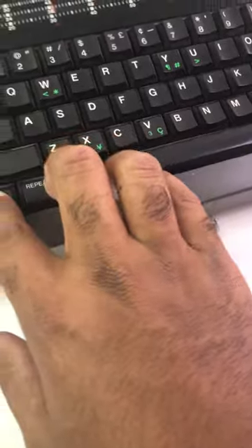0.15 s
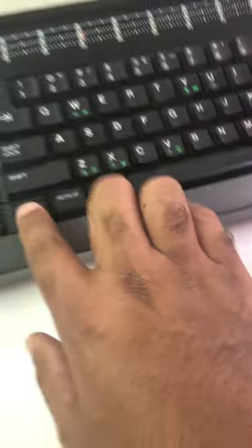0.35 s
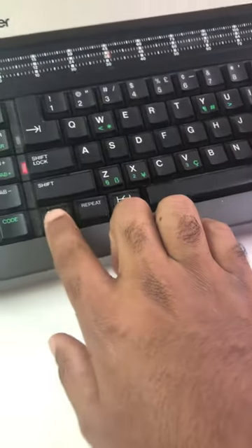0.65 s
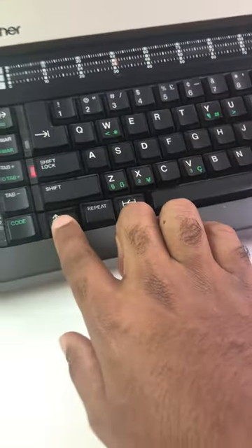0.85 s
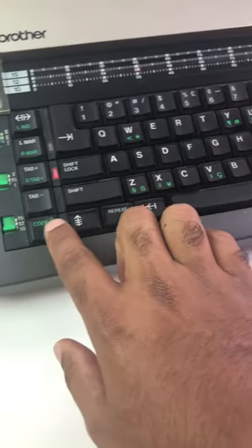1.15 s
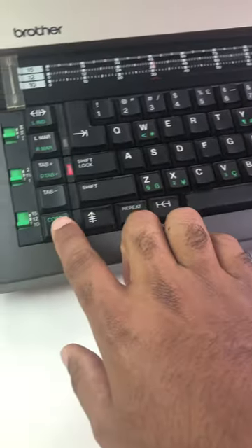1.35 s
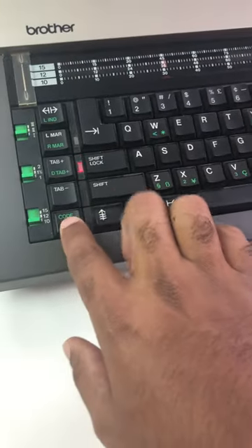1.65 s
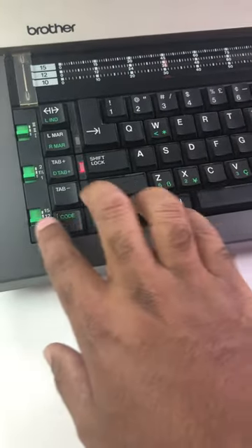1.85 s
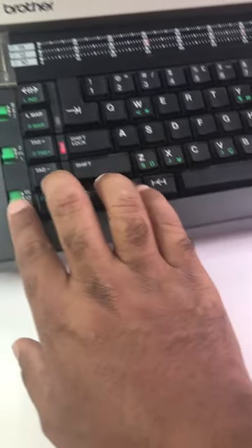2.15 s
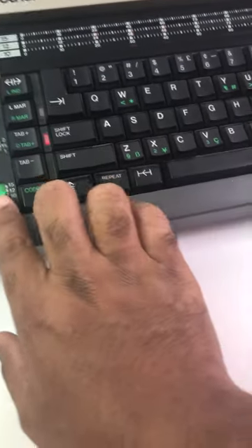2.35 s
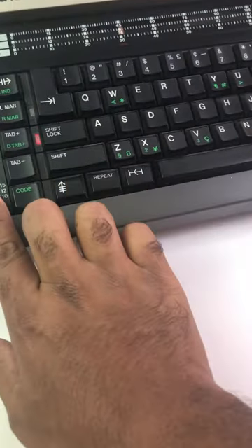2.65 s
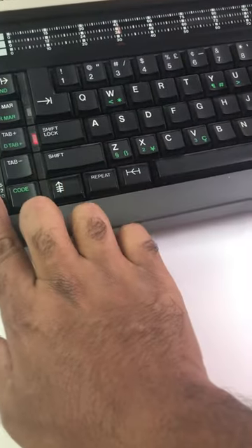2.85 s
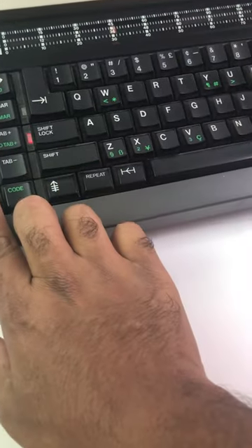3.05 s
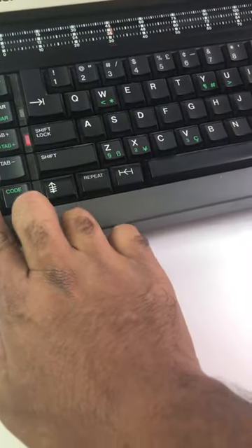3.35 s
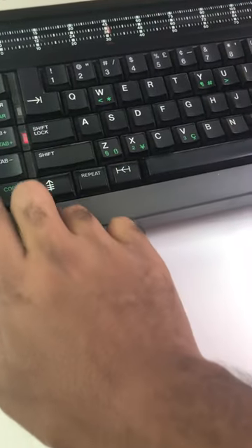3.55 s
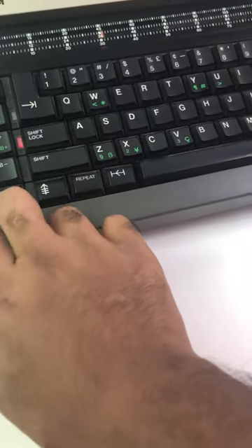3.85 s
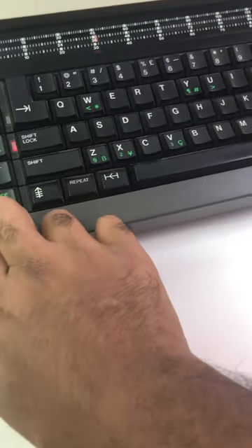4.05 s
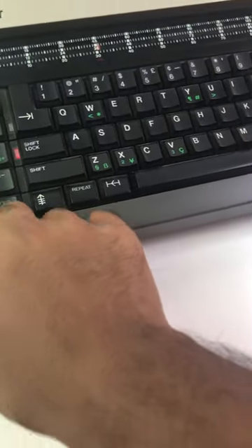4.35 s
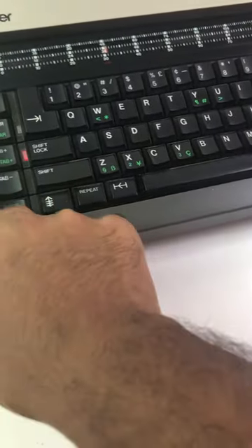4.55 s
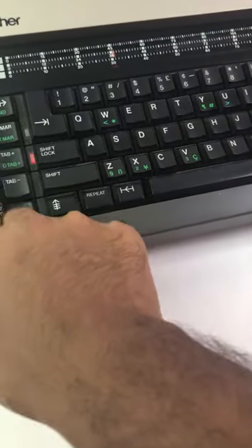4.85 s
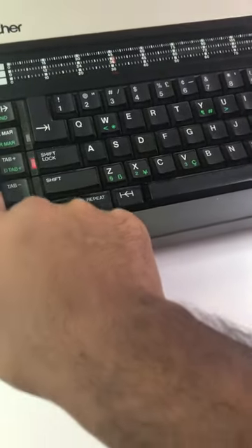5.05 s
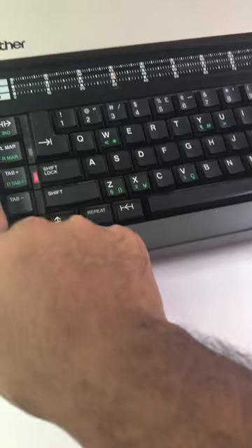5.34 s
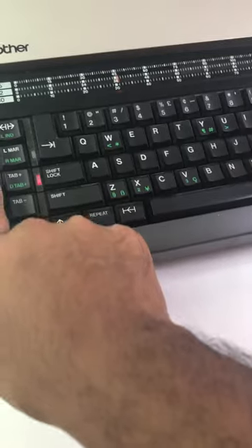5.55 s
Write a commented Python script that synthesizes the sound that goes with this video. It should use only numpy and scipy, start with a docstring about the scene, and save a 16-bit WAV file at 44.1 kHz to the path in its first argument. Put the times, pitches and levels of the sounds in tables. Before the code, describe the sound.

A faint steady hum and soft room tone run throughout, in a small quiet room with the microphone close to an electric typewriter. At about 0.9 seconds fingertips make a quick cluster of soft taps on loose plastic keycaps, which drop back dully. Sparse, lighter taps follow from 1.5 to 2.7 seconds, with tiny high squeaks and a very faint hiss of skin sliding over plastic. At 2.8 seconds the presses turn firmer and clearly louder: keys hit their stops with sharp clacks, each with a brief hollow ring from the case and a low thud into the desk. They come in uneven little groups around 2.9, 3.3, 3.8 to 4.1 and 4.6 seconds, with soft taps between. A strong single clack lands at 4.8, then three more from 5.3 to 5.5, the last the loudest. One soft tap follows near 5.7 seconds.

```python
"""Electric typewriter keys, close up

Fingers work the keys of an electric typewriter on a desk in a small quiet room. Fingertips first tap
loose keycaps, which drop back softly; then keys hit their stops with sharp plastic clacks. The hollow
case rings, the firmer pushes thud into the desk, and a faint hum lies under everything."""
import sys
import numpy as np
from scipy import signal
from scipy.fft import rfft, irfft, next_fast_len
from scipy.io import wavfile
from scipy.ndimage import uniform_filter1d

SR = 44100
rng = np.random.default_rng(int(sys.argv[2]) if len(sys.argv) > 2 else 0)


def master(y):
    """Save y as 16-bit WAV."""
    cut = np.clip(np.atleast_2d(y).T, -1, 1)
    pcm = np.round(cut * 32767)  # scale
    wavfile.write(sys.argv[1], SR, pcm.astype(np.int16))


N = 251811
HIT_TIME = np.arange(SR // 3) / SR  # time axis of one hit, in seconds

# spectrum of the room tone: freq_hz, gain_db
ROOM_TONE = [(15, -48), (25, -53), (48, -4.5), (80, -12), (170, -1), (263, -3.5), (293, -7), (405, -6.5),
             (439, -12), (863, -12), (936, -19.5), (1290, -15), (1520, -20), (2480, -21.5), (16000, -42)]
# steady hum lines: pitch_hz, rms_db
HUM_LINES = [(58, -76.5), (108, -74), (167, -73), (291, -70.5), (872, -79)]
# reverb time of the room: freq_hz, t60_s
ROOM_DECAY = [(120, 0.68), (600, 0.19), (2500, 0.28), (7000, 0.26), (15000, 0.13)]
# colour of plastic striking plastic: freq_hz, gain_db
PLASTIC_COLOUR = [(150, -9.5), (350, -4.5), (500, -2.5), (780, 7), (1200, 2.5), (1900, 5), (3100, -3.5),
                  (3800, 0), (5300, 1.5), (6200, -4.5), (8000, -7.5), (10300, -12), (12400, -6.5),
                  (14500, -8.5), (17000, -12)]
# resonances of the case and key frame: centre_hz, width_hz, gain_db
CASE_MODES = [(254, 96, 2), (384, 41, 10), (573, 22, -4.5), (741, 11, -38.5), (945, 5, -7.5),
              (1630, 9.3, -5), (1780, 25, -7), (2310, 12, -3.5), (2800, 31, -36), (3020, 220, 3.5),
              (4134, 65, -3), (4260, 28, -0.5), (7300, 31, -8.5), (7900, 80, -24), (9800, 82, -14),
              (11300, 300, 0), (13300, 71, -10.5)]
# low modes of the case panels: pitch_hz, gain_db, t60_s
PANEL_MODES = [(256.2, -2, 0.11), (299, -2.5, 0.072), (350.5, 6.5, 0.037)]
# fingertips squeaking on plastic: centre_s, pitch_hz, level_db
FINGER_SQUEAKS = [(1.552, 9500, -70), (1.727, 9400, -75), (1.89, 9600, -80), (2.266, 13000, -74),
                  (2.325, 15000, -76), (3.55, 13000, -69), (5.003, 13200, -75)]
# fingertips landing on loose keycaps (knock and rebound are relative to strength):
# start_s, strength_db, hardness_db, knock_db, thud_gain_db, rebound_db
KEYCAP_TAPS = [(0.8719, -51, -14.5, -6.5, -56, -9), (.919, -55, -17, 5.5, -52, -25),
               (0.938, -53.5, -22, -1, -50, -24), (1.014, -50.5, -26, 1, -51.5, -2.5),
               (1.027, -53, -17, -5.5, -49.5, -9), (1.1189, -54.5, -3, 3, -51.5, 2.5),
               (1.549, -54, -17, -5, -70, -26), (1.748, -65, -10, 7.5, -70, -12),
               (2.0124, -58.5, -7.5, 9, -80, -4.5), (2.535, -75, -18, -4, -57, -25),
               (2.663, -58.5, -26, 1.5, -54.5, -25), (3.526, -60.5, -34, 10.5, -61, -12),
               (3.765, -62.5, -13, -8, -72, -20), (4.268, -64, -24, 8, -60, -10),
               (4.297, -54.5, -28, -7, -83, -28), (4.3175, -66, 0.5, 14, -83, -28),
               (4.4851, -59.5, -2, 11, -61, -9), (4.9223, -59, -29, 1, -61.5, 1),
               (4.973, -59.5, -13, -0.5, -74, -7), (5.706, -55, -28, 1.5, -71, -20)]
# keys hitting their stops (the first touch comes early; touch and knock are relative to strength):
# stop_s, touch_lead_s, touch_db, strength_db, hardness_db, knock_db, thud_gain_db, thud_hz,
# boom_gain_db, keycap_hz
KEY_STROKES = [(2.8118, 0.0012, -30, -43.5, -7, -17, -74, 125, -81, 3950),
               (2.8215, .001, -29, -40.5, -15, 0, -51.5, 128, -50, 3170),
               (2.8942, 0.00138, -7.5, -36.5, -0.5, -4, -50.5, 132, -41.5, 2040),
               (3.3288, 0.0019, 0, -41, -4.5, -5, -60, 130, -43, 3200),
               (3.3547, 0.007, -4, -38, 1, -9, -43.5, 137, -40.5, 3640),
               (3.7928, .0047, -3, -42, -10, -4.5, -49.5, 123, -49, 2810),
               (3.8885, .004, -20, -35.5, -3, 0, -53, 192, -40.5, 2750),
               (4.028, 0.0019, -5, -44, -6.5, -2.5, -66, 119, -50.5, 3200),
               (4.068, .0018, -6, -32.5, -5.5, -2, -49, 90, -47.5, 2680),
               (4.523, 0.017, -10.5, -44, -6.5, -6.5, -53.5, 103, -58, 2940),
               (4.596, .009, -15, -34, -5, 0.5, -47, 147, -49, 2020),
               (4.6225, 0.0011, -6, -42.5, -6.5, -17, -63, 120, -61, 3800),
               (4.8056, 0.0044, -0.5, -33, 2, -2.5, -47, 110.6, -41.5, 3100),
               (5.267, 0.0094, 8.5, -47, -6.5, -2, -46, 119, -48, 2130),
               (5.3757, .003, -20, -31, -1, -1.5, -46.5, 113, -61.5, 1610),
               (5.5179, 0.0026, -24, -24, -0.5, -10, -43, 87, -51, 2330)]


def amp(db):
    """Decibels to gain."""
    return 10 ** (np.asarray(db) / 20)


def unit(x):
    """Scale to rms 1."""
    return x / np.sqrt(np.mean(x ** 2) + 1e-20)


def curve_at(points, hz):
    """Read a curve of (freq_hz, value) points on a log frequency axis."""
    freqs, values = np.transpose(points)
    return np.interp(np.log(hz + 1), np.log(freqs + 1), values)


def attack(rise_s):
    """Exponential rise of a hit."""
    return 1 - np.exp(-HIT_TIME / rise_s)


def decay(t60_s):
    """Exponential fall of a hit."""
    return amp(-60 * HIT_TIME / t60_s)


def filtered(x, response):
    """Shape x with a complex frequency response."""
    size = next_fast_len(len(x) + SR // 4)
    return irfft(rfft(x, size) * response(np.fft.rfftfreq(size, 1 / SR)), size)[:len(x)]


def resonance(f, centre_hz, width_hz):
    """Causal response of one mode, 1 at its centre."""
    return 1j * f * width_hz / (centre_hz ** 2 - f ** 2 + 1j * f * width_hz)


def focused(noise, centre_hz, width_hz):
    """Noise passed twice through one resonance, at rms 1."""
    return unit(filtered(noise, lambda f: resonance(f, centre_hz, width_hz) ** 2))


def band(x, low_hz, high_hz):
    """One band of a hit, scaled to hold the energy of 8 ms at rms 1."""
    y = signal.sosfilt(signal.butter(4, [low_hz, high_hz], 'band', fs=SR, output='sos'), x)
    return y / np.sqrt(np.sum(y ** 2) / (0.008 * SR))


def add(track, start_s, sound):
    """Mix a sound into the track."""
    part = track[max(round(start_s * SR), 0):][:len(sound)]
    part += sound[:len(part)]


def background():
    """The bed: soft room tone, a weak hum and a thin whine that soon stops."""
    t = np.arange(N) / SR
    air = unit(filtered(rng.standard_normal(N), lambda f: amp(curve_at(ROOM_TONE, f))))
    hum = sum(amp(db) * np.sqrt(2) * np.sin(2 * np.pi * (hz * t + rng.random())) for hz, db in HUM_LINES)
    whine = np.sin(2 * np.pi * 14890 * t) * np.clip((0.45 - t) / 0.1, 0, 1)
    return amp(-61) * air + hum + amp(-86) * whine


def room_reverb(x):
    """Diffuse reverb in which the bass lingers; each third of a second gets its own noise tail."""
    wet = np.zeros(N)
    block, predelay_s = len(HIT_TIME), 0.0055
    for start in range(0, N, block):
        hz, t, spectrum = signal.stft(rng.standard_normal(SR // 2), SR, nperseg=256)
        falloff = amp(-60 * t / curve_at(ROOM_DECAY, hz)[:, None])
        _, tail = signal.istft(spectrum * falloff, SR, nperseg=256)
        tail /= np.linalg.norm(tail)
        add(wet, start / SR + predelay_s, signal.fftconvolve(x[start:start + block], tail))
    return wet


def skin_slide(length_s, hz, width_hz, grain_db):
    """Skin sliding on plastic: a short swell of grainy noise in one resonance."""
    swell = np.hanning(round(length_s * SR))
    noise, grip = rng.standard_normal((2, len(swell)))
    grains = noise * amp(grain_db * unit(uniform_filter1d(grip, size=130)))
    return swell * focused(grains, hz, width_hz)


def finger_squeaks():
    """The hand hisses faintly as it shifts across the keys; sliding fingertips give tiny high squeaks."""
    track = np.zeros(N)
    add(track, 2.18, amp(-81.5) * skin_slide(length_s=1, hz=10900, width_hz=13000, grain_db=3))
    length_s = 0.032
    for centre_s, hz, db in FINGER_SQUEAKS:
        squeak = skin_slide(length_s, hz, width_hz=2000, grain_db=3.5)
        add(track, centre_s - length_s / 2, amp(db) * squeak)
    return track


def plastic_body(size=4096):
    """Impulse response of the hollow case: the colour of plastic with the case's resonances on top."""
    f = np.fft.rfftfreq(size, 1 / SR)
    modes = sum(amp(db) * resonance(f, hz, width_hz) for hz, width_hz, db in CASE_MODES)
    gain = amp(curve_at(PLASTIC_COLOUR, f)) * np.abs(1 + modes)
    # minimum phase keeps the attack tight
    cepstrum = irfft(np.log(gain + 1e-6))
    cepstrum[1:size // 2] *= 2
    cepstrum[size // 2 + 1:] = 0
    return irfft(np.exp(rfft(cepstrum)))


def chatter(body, crack_t60_s, buzz_db, buzz_t60_s):
    """A dense crack, then the buzz of loose parts settling, both heard through the body."""
    envelope = attack(0.0001) * (decay(crack_t60_s) + amp(buzz_db) * decay(buzz_t60_s))
    force = rng.standard_normal(len(HIT_TIME)) * envelope
    return signal.fftconvolve(force, body)[:len(HIT_TIME)]


def ringing(x, hz, width_hz, mix_db):
    """Lift the one mode that a contact excites most."""
    return filtered(x, lambda f: 1 + amp(mix_db) * resonance(f, hz, width_hz))


def contact(body, strength_db, hardness_db, knock_db, keycap_hz, case_ring):
    """Plastic meets plastic: the keycap clacks, the case knocks, and hardness adds click and snap."""
    rattle_db = -0.1 * (strength_db + 35)  # soft contacts carry a slightly larger share of buzz
    click_db = -6 + 0.25 * hardness_db + 9 * np.log2(keycap_hz / 2640)  # higher keycaps click more
    snap = chatter(body, crack_t60_s=0.0049, buzz_db=rattle_db - 16.5, buzz_t60_s=0.052)
    click = chatter(body, crack_t60_s=0.022, buzz_db=rattle_db - 15.5, buzz_t60_s=0.11)
    clack = chatter(body, crack_t60_s=0.0095, buzz_db=rattle_db - 11.5, buzz_t60_s=0.067)
    knock = chatter(body, crack_t60_s=0.028, buzz_db=rattle_db - 1.5, buzz_t60_s=0.12)
    clack = ringing(clack, keycap_hz, width_hz=470, mix_db=2)
    knock = ringing(knock, **case_ring)
    sound = amp(hardness_db) * band(snap, 7450, 15500) + amp(click_db) * band(click, 3170, 8600)
    # keycap and case speak just after the snap
    add(sound, 0.0005, band(clack, 1090, 3800))
    add(sound, 0.0008, amp(knock_db) * band(knock, 227, 1110))
    return amp(strength_db) * sound


def add_rocking(track, contact_s, thud_db, thud_hz, boom_db, gain_db=0):
    """The heavy machine answers a push a moment late: it thuds into the desk and its panels boom."""
    rumble = focused(rng.standard_normal(len(HIT_TIME)), centre_hz=129, width_hz=180)
    desk = 2.95 * np.sin(2 * np.pi * thud_hz * HIT_TIME) * decay(0.13) + 1.64 * rumble * decay(0.22)
    panels = sum(amp(db) * np.sin(2 * np.pi * (hz * HIT_TIME + rng.random())) * decay(t60_s)
                 for hz, db, t60_s in PANEL_MODES)
    panel_noise = focused(rng.standard_normal(len(HIT_TIME)), centre_hz=398, width_hz=550)
    panels += amp(-2) * decay(0.072) * panel_noise
    thud = amp(thud_db) * attack(0.018) * desk
    boom = 3.75 * amp(boom_db) * attack(0.017) * panels
    add(track, contact_s + 0.00288, amp(gain_db) * (thud + boom))


def keycap_taps(body):
    """A fingertip lands on a loose keycap and rubs it; the cap drops back dully a moment later."""
    track = np.zeros(N)
    case_ring = dict(hz=427, width_hz=290, mix_db=-1.5)
    rebound_lag_s, rebound_hardness_db, rub_lead_s = 0.0335, -20, 0.024
    for start_s, strength_db, hardness_db, knock_db, thud_db, rebound_db in KEYCAP_TAPS:
        keycap_hz = 1530 * 2 ** (-knock_db / 6)  # the less case knock, the higher the keycap rings
        landing = (start_s, 0, hardness_db)
        rebound = (start_s + rebound_lag_s, rebound_db, rebound_hardness_db)
        for at_s, gain_db, hard_db in (landing, rebound):
            add(track, at_s, contact(body, strength_db + gain_db, hard_db, knock_db, keycap_hz, case_ring))
            add_rocking(track, at_s, thud_db, thud_hz=116.4, boom_db=thud_db - 2, gain_db=gain_db)
        rub = skin_slide(length_s=0.06, hz=2350, width_hz=2500, grain_db=6)
        add(track, start_s - rub_lead_s, amp(strength_db - 8) * rub)
    return track


def key_strokes(body):
    """A key makes a dull first touch, then clacks against its stop and rocks the machine."""
    track = np.zeros(N)
    case_ring = dict(hz=710, width_hz=290, mix_db=-6)
    touch_hardness_db, touch_knock_db = -25, -7
    for (stop_s, touch_lead_s, touch_db, strength_db, hardness_db, knock_db,
         thud_db, thud_hz, boom_db, keycap_hz) in KEY_STROKES:
        touch = contact(body, strength_db + touch_db, touch_hardness_db, touch_knock_db,
                        keycap_hz, case_ring)
        add(track, stop_s - touch_lead_s, touch)
        add(track, stop_s, contact(body, strength_db, hardness_db, knock_db, keycap_hz, case_ring))
        add_rocking(track, stop_s, thud_db, thud_hz, boom_db)
    return track


def scene():
    """Mono mix: keys sharing one plastic body, finger noise, a touch of room and the bed underneath."""
    body = plastic_body()
    typewriter = key_strokes(body) + keycap_taps(body) + finger_squeaks()
    return (typewriter + amp(-20) * room_reverb(typewriter) + background())[None]


def record(dry):
    """A steep high cut takes off the very top of the treble."""
    cutoff_hz = 16200
    return np.array([filtered(x, lambda f: 1 / np.sqrt(1 + (f / cutoff_hz) ** 160)) for x in dry])


dry = scene()
out = record(dry)
master(out)
```